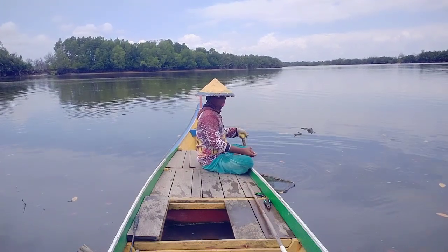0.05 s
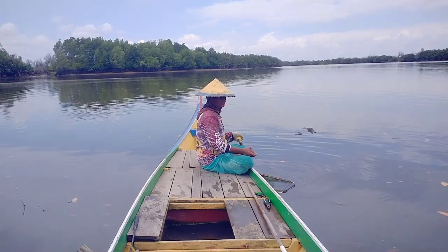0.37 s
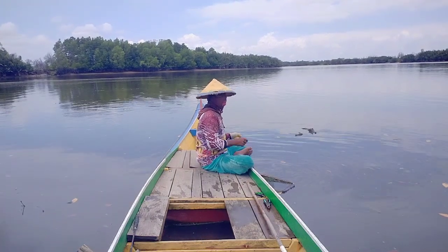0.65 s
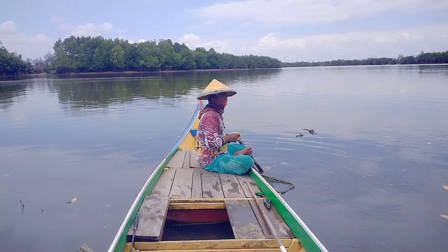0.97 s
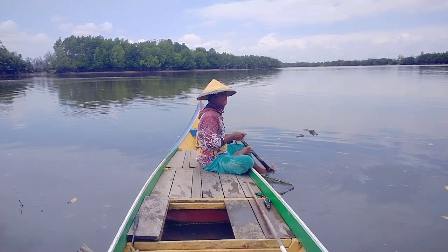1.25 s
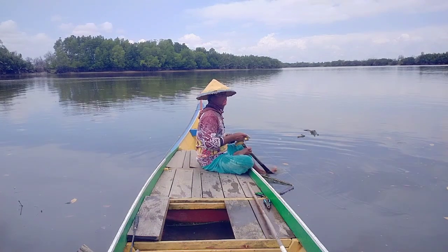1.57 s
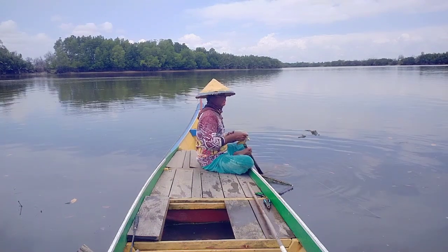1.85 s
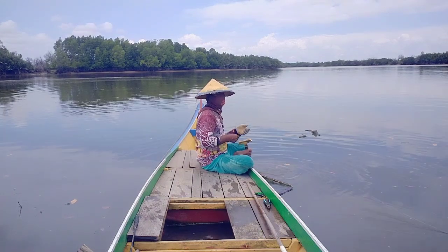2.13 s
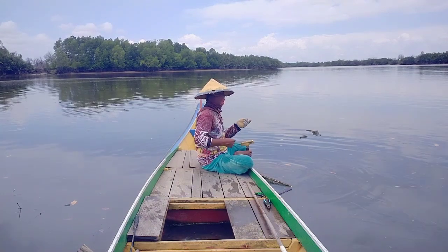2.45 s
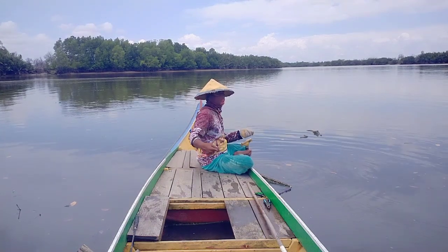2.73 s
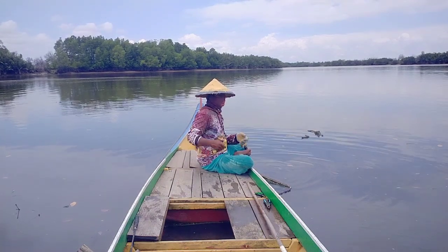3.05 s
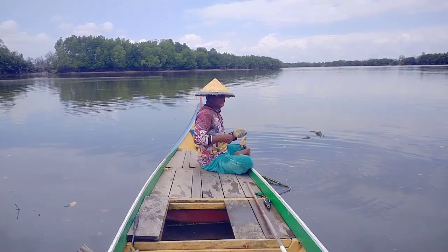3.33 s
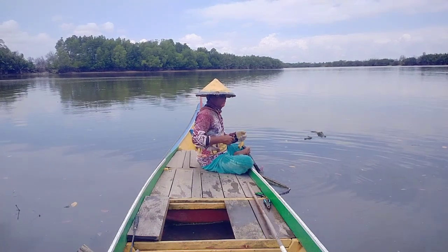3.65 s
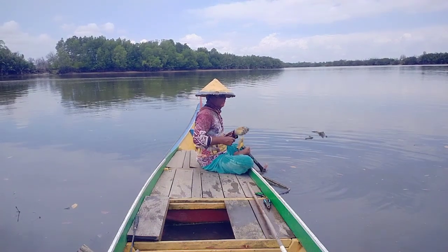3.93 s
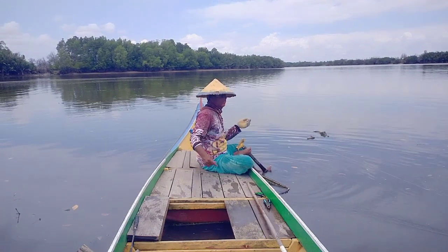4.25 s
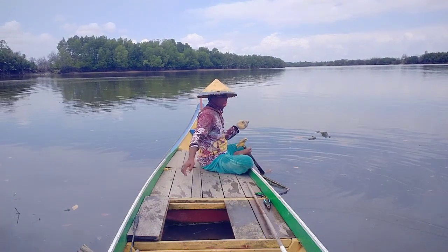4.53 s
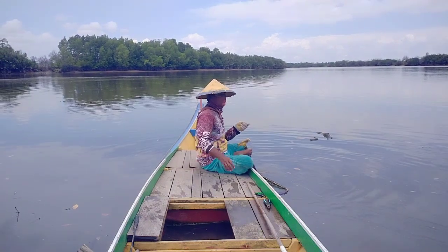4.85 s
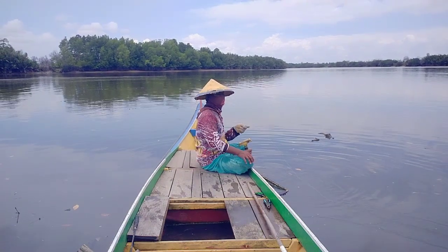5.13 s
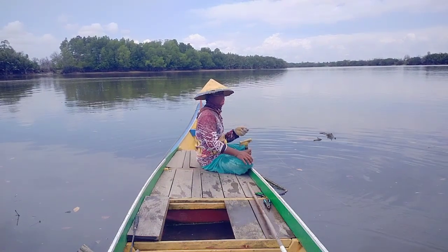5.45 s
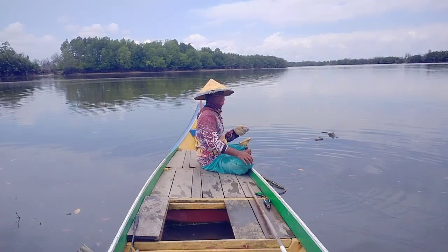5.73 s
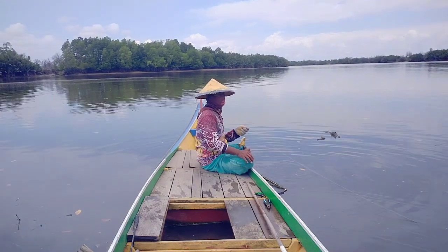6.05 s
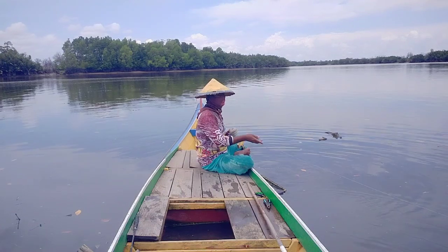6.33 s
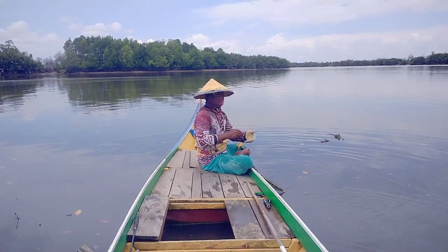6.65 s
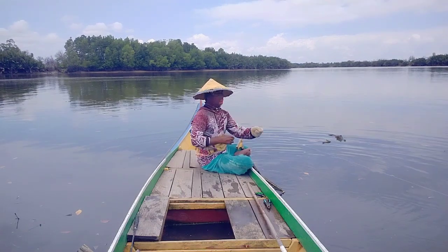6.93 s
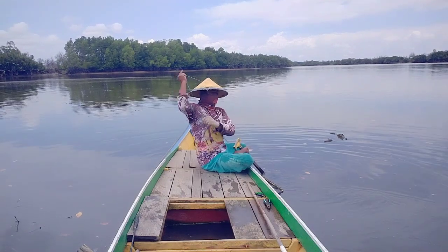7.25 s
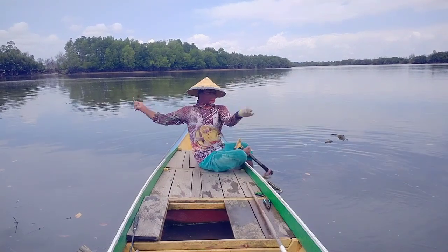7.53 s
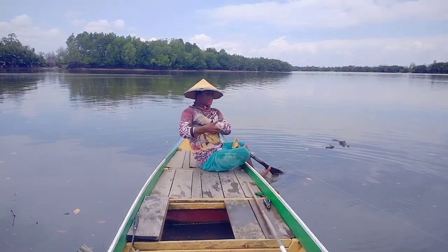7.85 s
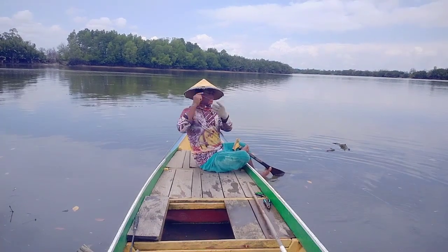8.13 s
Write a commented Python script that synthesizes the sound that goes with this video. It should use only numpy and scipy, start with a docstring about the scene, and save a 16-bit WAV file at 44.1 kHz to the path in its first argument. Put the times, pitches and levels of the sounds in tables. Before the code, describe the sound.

Heard from a small wooden boat, a wet line is pulled in with soft swishes, tiny ticks and drops plinking into the river. Across the water a bird whistles the same high note again and again with a slight echo, twice joined by a lower call. Light wind and a far engine make a quiet, steady rumble. Near the end come a quick cluster of hull knocks, then a sharp tap and a brief, louder splatter.

```python
"""Soft wind, insects and a far engine's hum, heard from a wooden boat drifting on a calm river.
Across the water a bird on the wooded bank repeats a rising whistle and a lower one answers; the
trees echo both. Close to the microphone someone hauls a wet line by hand: it swishes and ticks,
drops ring as bubbles in the river, and knocks set the hull boards ringing."""
import sys
import numpy as np
from scipy import signal
from scipy.fft import rfft, irfft, next_fast_len
from scipy.io import wavfile

SR = 44100
rng = np.random.default_rng(int(sys.argv[2]) if len(sys.argv) > 2 else 0)


def to_wav(sig):
    """Store sig (one row per channel, or 1-D mono) as 16-bit WAV at the path in sys.argv[1].

    Samples outside -1..1 are clipped; the rate is SR.
    """
    pcm = np.clip(np.atleast_2d(sig), -1, 1) * 32767
    pcm = np.round(pcm).astype(np.int16)
    wavfile.write(sys.argv[1], SR, pcm.T)  # frames by channels


N = 369558
TIME = np.arange(N) / SR
# spectrum of spattering water and wet ticks: (frequency [Hz], density [dB])
SPATTER_SPECTRUM = [(900, -27), (1900, 6.5), (4300, 7), (6000, -4.5), (9000, -4.5), (15500, 0)]


def amp(db):
    """Decibels to gain."""
    return 10 ** (np.asarray(db) / 20)


def unit(x):
    """Scales to rms 1."""
    return x / np.sqrt(np.mean(x ** 2) + 1e-30)


def decay(t, t60):
    """Falls 60 dB in t60 seconds."""
    return np.exp(-np.log(1000) * t / t60)


def add(mix, s, sound):
    """Mixes a sound in at time s."""
    part = mix[max(round(s * SR), 0):][:len(sound)]
    part += sound[:len(part)]


def noise(shape_db, size=N):
    """Noise of rms 1 whose spectrum in dB is a function of frequency."""
    length = next_fast_len(size, True)
    hz = np.fft.rfftfreq(length, 1 / SR) + 1
    return unit(irfft(rfft(rng.standard_normal(length)) * amp(shape_db(hz)), length)[:size])


def spectrum(points, tilt_db=0):
    """Joins (Hz, dB) points on a log axis, with a tilt per octave."""
    f, db = np.transpose(points)
    return lambda hz: np.interp(np.log(hz), np.log(f), db) + tilt_db * np.log2(hz)


def drift(rate):
    """Slow random wander of rms 1, up to about rate changes a second."""
    return noise(lambda hz: -10 * np.log10(1 + (hz / rate) ** 4))


def air(breeze_db=-57, hiss_db=-65.5, ripple_db=.5):
    """Background wash of the open air, puffs of wind on the microphone, and a thin hiss."""
    # spectra of the wash, the wind and the hiss: (frequency [Hz], density [dB])
    wash_spectrum = [(20, -5.5), (60, 3.5), (120, 0), (200, -2), (310, -5.5), (500, -11), (800, -13.5),
                     (1300, -13), (1900, -12.5), (2400, -14.5), (3200, -21), (4200, -22.5), (6000, -29),
                     (10000, -35.5)]
    wind_spectrum = [(8, 1), (20, 5.5), (35, -11), (55, -2.5), (100, -15), (250, -32.5), (800, -67)]
    hiss_spectrum = [(2500, -6), (5000, -7), (7500, 2.5), (9500, 1.5), (11500, 1.5), (14000, 5.5),
                     (15700, 9)]
    # background wash, lifted near 7.35 s by close rustling after the knock: (time [s], level [dB])
    wash_level = [(0, -55.5), (4.2, -55), (6.4, -55), (7.35, -53), (8.0, -54.5)]
    # puffs over the breeze: (peak time [s], half width [s], level [dB])
    gusts = [(1.34, 0.027, -43), (1.64, 0.082, -47), (3.88, 0.34, -50), (5.56, .07, -50.5),
             (6.03, 0.25, -54), (6.68, 0.12, -49.5), (7.21, 0.047, -46.5)]
    wash = noise(spectrum(wash_spectrum))
    wash *= amp(np.interp(TIME, *np.transpose(wash_level)) + ripple_db * drift(12))
    gust_power = sum(amp(db) ** 2 * np.exp(-((TIME - s) / width) ** 2) for s, width, db in gusts)
    wind = noise(spectrum(wind_spectrum)) * np.sqrt(amp(breeze_db) ** 2 + gust_power)
    return wash + wind + amp(hiss_db) * noise(spectrum(hiss_spectrum))


def insects(throb_db=2, swell_db=1.0, wobble_hz=55, wander_hz=25):
    """Faint, narrow bands of shrilling; each throbs at its own pace and lifts in pitch as it does."""
    # insect chorus: (centre [Hz], width [Hz], level [dB], throb rate [Hz])
    chorus = [(8106, 92, -77.5, 3.7), (8350, 220, -79, 16), (8614, 120, -79, 22)]
    out = np.zeros(N)
    for hz, width, db, rate in chorus:
        throb = np.sin(2 * np.pi * np.cumsum(rate * (1 + drift(1.95) / 10)) / SR)
        band = noise(lambda f: -20 * np.log10(1 + ((f - hz) / width * 2) ** 2))
        shrill = signal.hilbert(band, next_fast_len(N))[:N]
        bend = np.exp(2j * np.pi * np.cumsum(wobble_hz * throb + wander_hz * drift(5)) / SR)
        out += (shrill * bend).real * amp(db + throb_db * throb + swell_db * drift(1.9))
    return out


def engine(firing_hz=82.76, fading=0.09, unsteady=.002):
    """A far engine: only the lowest firing orders carry this far, each fading by itself on the way."""
    # partials of the hum: (multiple of the firing rate, relative level [dB])
    orders = [(1, -2.5), (2, -22), (3, -27.5)]
    # its loudness at the boat: (time [s], level [dB])
    loudness = [(0.0, -55), (0.71, -59.5), (1.63, -56.5), (1.79, -62), (3.28, -51), (3.45, -58),
                (3.86, -51.5), (5.38, -53.5), (5.47, -48), (7.1, -56.5), (7.28, -50), (8.25, -51.5)]
    phase = 2 * np.pi * np.cumsum(firing_hz * (1 + unsteady * drift(1.05))) / SR
    hum = sum(amp(db) * (1 + fading * drift(12)) * np.sin(order * phase) for order, db in orders)
    return amp(np.interp(TIME, *np.transpose(loudness))) * unit(hum)


def bank(x, near_db=-9, near_t60=0.14, far_db=-8.5, far_t60=1.04, echo_s=.095):
    """Boat and water scatter the sound at once; the trees send back two echoes and a long tail."""
    t = TIME[:SR]
    near, far = rng.standard_normal((2, SR)) * (rng.random((2, SR)) < 1 / 20)  # sparse reflections
    near = unit(near * decay(t, near_t60))
    far = unit(far * decay(t, far_t60) * np.minimum(2 * t / echo_s, 1))
    out = signal.fftconvolve(x, (amp(near_db) * near + amp(far_db) * far) / np.sqrt(SR))[:N]
    add(out, echo_s, amp(-9) * x)
    add(out, 0.18, amp(-17) * x)
    return out


def whistle(call, waver, flutter, scoop_s=.045, climb_per_s=.108, break_s=0.018):
    """One bird's pure tone: it scoops in, climbs and may break upward, never quite steady."""
    start, length, top_hz, db, swell_db, scoop_hz, break_at, break_hz = call
    scoop_db_per_hz, attack_s, release_s = 0.04, .01, 0.012
    t = np.arange(0, length, 1 / SR)
    left = length - t
    scoop = scoop_hz * np.exp(-t / scoop_s)
    before_break = (1 - np.tanh((t - break_at) / break_s)) / 2
    pitch = top_hz * (1 - climb_per_s * left) - scoop - break_hz * before_break
    pitch *= 1 + np.interp(start + t, TIME, waver)
    level_db = db - swell_db * left / length - scoop_db_per_hz * scoop
    level_db += np.interp(start + t, TIME, flutter)
    edges = np.minimum(t / attack_s, 1) * np.minimum(left / release_s, 1)
    return np.sqrt(2) * amp(level_db) * edges * np.sin(2 * np.pi * np.cumsum(pitch) / SR)


def birds(direct_db=-3.0, flutter_db=2.5, unsteady=0.001):
    """A high and a low bird on the bank, heard straight across the water and off the trees."""
    # whistled calls: (start [s], length [s], final pitch [Hz], final level before the crossing [dB],
    # swell [dB], opening scoop [Hz], time to the break [s], upward break [Hz])
    calls = [(0.102, .06, 6620, -79, -8, 2, 0, 0), (1.353, 0.26, 2600, -63.5, 1, 0, 0.11, 108),
             (1.762, 0.074, 5830, -66.5, -2, 0, 0, 0), (1.835, .48, 5213, -59.5, -2, -37, 0.19, 40),
             (2.896, .53, 5280, -54.5, 4, 168, 0.29, 141.5), (4.079, 0.53, 5290, -55, 6.5, 149, .125, 126),
             (5.248, .445, 5295, -49.5, 11, 350, .225, 119.5), (6.437, .44, 5230, -54.5, 4, 401, .2, 63),
             (6.588, 0.24, 2637, -60, 3, -2, .175, 135)]
    out, flutter, waver = np.zeros(N), flutter_db * drift(25), unsteady * drift(90)
    for call in calls:
        add(out, call[0], whistle(call, waver, flutter))
    return amp(direct_db) * out + bank(out)


def swishes(grain_db=2):
    """Line and cloth rub close by: grainy friction noise that swells and dies with each pull."""
    # pulls: (start [s], rise [s], time to fall 20 dB [s], level [dB], centre [Hz], half width [octaves])
    pulls = [(.672, 0.016, 0.23, -55.5, 2460, 0.68), (.68, 0.035, .09, -65, 6500, .7),
             (1.12, .08, 0.3, -67, 3500, 0.66), (2.53, .041, .1, -64.5, 4500, 1.2),
             (2.865, .02, 0.13, -63.5, 4190, 0.51), (3.93, 0.12, 0.38, -55.5, 1860, 2.1),
             (3.999, 0.1, 0.063, -56, 9900, 1.3), (5.648, 0.0086, 0.076, -56, 900, 1.3),
             (6.02, 0.015, 0.23, -61.5, 2820, .42), (7.14, 0.023, 0.16, -45, 770, 2.8),
             (7.425, 0.039, 0.045, -45, 853, 1.7), (7.448, 0.0098, .05, -54.5, 7500, 1.1),
             (7.68, 0.06, 0.16, -56, 1710, 1.2), (8.299, 0.035, 0.054, -46.5, 2040, 0.61)]
    out, t, grain = np.zeros(N), TIME[:SR // 2], amp(grain_db * drift(150))
    for s, rise, fall, db, centre, octaves in pulls:
        stroke = np.minimum(t / rise, 1) * amp(-20 * np.maximum(t - rise, 0) / fall)
        rub = noise(lambda hz: -20 * np.log10(1 + (np.log2(hz / centre) / octaves) ** 2)
                    - 10 * np.log10(1 + (hz / centre / 2) ** 2), size=len(t))
        add(out, s, amp(db) * stroke * rub)
    return out * grain


def ticks(gap_s=0.057, spread_db=12, t60=0.013, tilt_db=7):
    """Tiny bright ticks at uneven moments as the wet line runs through the hand."""
    # spells of ticking: (start [s], length [s], lowest level [dB])
    spells = [(4.503, .15, -52), (5.5, .2, -62), (6.452, .45, -59), (7.622, .45, -57.5), (8.28, .1, -47)]
    out, t = np.zeros(N), TIME[:SR // 50]
    for start, length, db in spells:
        for s in np.arange(start, start + length, gap_s):
            late, size = rng.random(2)
            tick = decay(t, t60) * noise(spectrum(SPATTER_SPECTRUM, tilt_db), size=len(t))
            add(out, s + late * gap_s, amp(db + spread_db * size) * tick)
    return out


def bubble(hz, cycles=57, glide=0.049):
    """A trapped bubble rings and rises in pitch as it nears the surface; small ones are brief."""
    t60 = cycles / hz
    t = TIME[:int(t60 * SR) + 2]
    onset = 1 - np.exp(-t * hz)
    return onset * decay(t, t60) * np.sin(2 * np.pi * hz * t * (1 + glide * t / t60))


def drips():
    """Water falls beside the boat: single drops ring as bubbles, spatters burst as sharp noise; the loudest
    burst, near 8.37 s, is a sharp tap on the boat among the splashes."""
    # drops in the river: (time [s], level [dB], pitch [Hz])
    drops = [(1.19, -48, 1480), (1.247, -50.5, 3700), (1.269, -38.5, 1330), (1.295, -45.5, 1590),
             (2.3583, -44.5, 8200), (2.865, -43.5, 4600), (3.9115, -48, 1196), (4.0617, -38, 9300),
             (4.094, -36.5, 6400), (4.1134, -37, 7470), (6.6826, -43, 8600), (6.741, -43, 8900),
             (7.076, -46.5, 946), (7.2225, -41, 7680), (7.6415, -34.5, 8450), (7.657, -36, 2220),
             (7.745, -46, 3350), (8.3705, -23, 4410), (8.371, -35, 452), (8.372, -25, 2400)]
    # spatters: (time [s], level [dB], t60 [s], treble tilt [dB per octave])
    spatters = [(4.0095, -41, 0.011, 9), (4.089, -39, .03, 7), (4.66, -44, .008, 7), (6.918, -44, .01, 12),
                (7.2225, -35, .008, 9), (7.7405, -40, .009, 6), (8.239, -39, .009, 6),
                (8.276, -32, 0.011, 2.5), (8.285, -36, 0.0066, 6), (8.353, -29, 0.0089, 6),
                (8.3678, -18, 0.013, 2), (8.372, -21.5, 0.013, 4.5)]
    out, t = np.zeros(N), TIME[:SR // 10]
    for s, db, hz in drops:
        add(out, s, amp(db) * bubble(hz))
    for s, db, t60, tilt_db in spatters:
        add(out, s, amp(db) * decay(t, t60) * noise(spectrum(SPATTER_SPECTRUM, tilt_db), size=len(t)))
    return out


def trickle(start_s=3.985, rise_s=0.061, length_s=.3, db=-53, fall_db_per_s=150, spread_db=12):
    """Water runs off the lifted line in a spray of tiny bubbles that builds quickly and fades."""
    out = np.zeros(N)
    for place, pitch, size in rng.random((190, 3)):
        age, hz = place * length_s, 5000 + 10000 * pitch
        flow = min(age / rise_s, 1) * amp(db - fall_db_per_s * max(age - rise_s, 0))
        add(out, start_s + age, flow * amp(spread_db * size) * bubble(hz))
    return out


def taps():
    """Something small and hard is tapped nearby and rings briefly in two bright modes."""
    # its modes: (frequency [Hz], relative level [dB], t60 [s])
    modes = [(2210, -0.5, 0.0089), (3290, -1.5, 0.0077)]
    # sharp taps: (time [s], level [dB])
    hits = [(8.2754, -19.5), (8.3296, -31)]
    out, t = np.zeros(N), TIME[:SR // 10]
    ring = sum(amp(db) * decay(t, t60) * (1 - np.exp(-t * hz)) * np.sin(2 * np.pi * hz * t)
               for hz, db, t60 in modes)
    for s, db in hits:
        add(out, s, amp(db) * ring)
    return out


def knocks(crack_t60=0.051, bounce_s=.0055, bounce_db=-7):
    """Each blow on the hull cracks, rings the boards a little differently, and bounces once."""
    # modes of hull and deck boards: (frequency [Hz], relative level [dB], t60 [s])
    boards = [(118, -11, 0.17), (287, -19, .15), (390, -19, 0.13), (462, -13.5, 0.083), (610, -4.5, 0.092),
              (722, -9, 0.091), (839, -3.5, 0.045), (1143, 2, 0.052), (1342, -6, 0.064),
              (1380, -1.5, 0.059), (1850, -7, 0.027), (1984, 1, 0.022), (2840, -12, 0.033),
              (3230, -11.5, 0.038), (3820, -16.5, 0.068), (4230, -8.5, 0.03)]
    # blows: (time [s], ring level [dB], crack level [dB])
    blows = [(6.932, -55.5, -50.5), (7.097, -55, -49), (7.113, -62, -48), (7.1594, -44.5, -54),
             (7.1698, -57, -45), (7.1893, -39.5, -32), (7.1926, -29.5, -35.5), (7.454, -57, -45),
             (7.4696, -46.5, -76)]
    # spectrum of the crack: (frequency [Hz], density [dB])
    crack_spectrum = [(100, -1), (700, 2), (2000, -5), (4000, -8.5), (5800, -15.5), (7500, -11.5),
                      (11000, -27), (15500, -21)]
    out, t = np.zeros(N), TIME[:SR // 3]
    for s, ring_db, crack_db in blows:
        for delay, landing_db in ((0, 0), (bounce_s, bounce_db)):
            signs = rng.choice([-1, 1], len(boards))
            ring = sum(sign * amp(db) * decay(t, t60) * np.sin(2 * np.pi * hz * t)
                       for sign, (hz, db, t60) in zip(signs, boards))
            crack = noise(spectrum(crack_spectrum), size=len(t)) * decay(t, crack_t60)
            add(out, s + delay, amp(landing_db) * (amp(ring_db) * ring + amp(crack_db) * crack))
    return out


def scene():
    """The river around and the work on board, at one microphone in the boat."""
    river = birds() + engine() + air() + insects()
    on_board = knocks() + taps() + swishes() + drips() + trickle() + ticks()
    return (river + on_board)[None]


def record(dry, edge_hz=15830):
    """The recorder's band limit: a steep low-pass."""
    lowpass = signal.firwin(801, edge_hz, window=("kaiser", 9), fs=SR)
    return signal.oaconvolve(dry, lowpass[None], "same")


dry = scene()
out = record(dry)
to_wav(out)
```